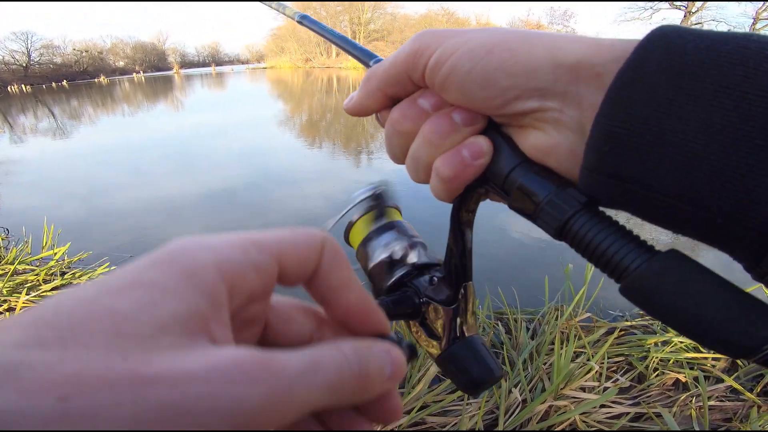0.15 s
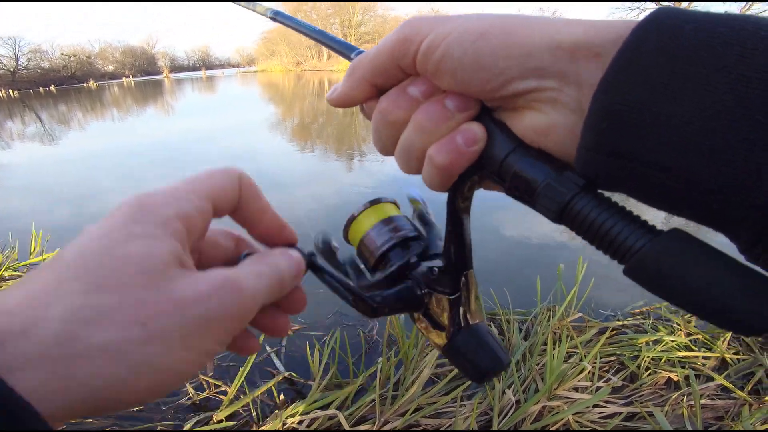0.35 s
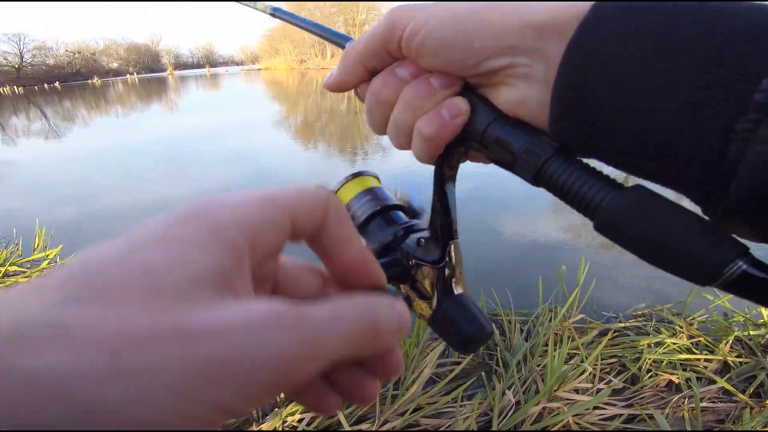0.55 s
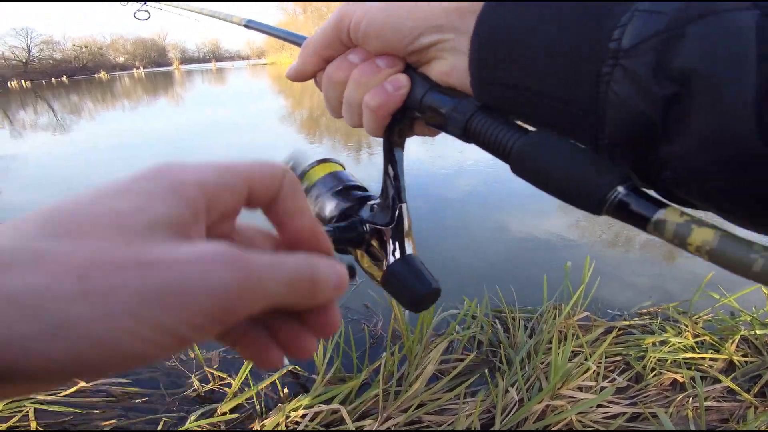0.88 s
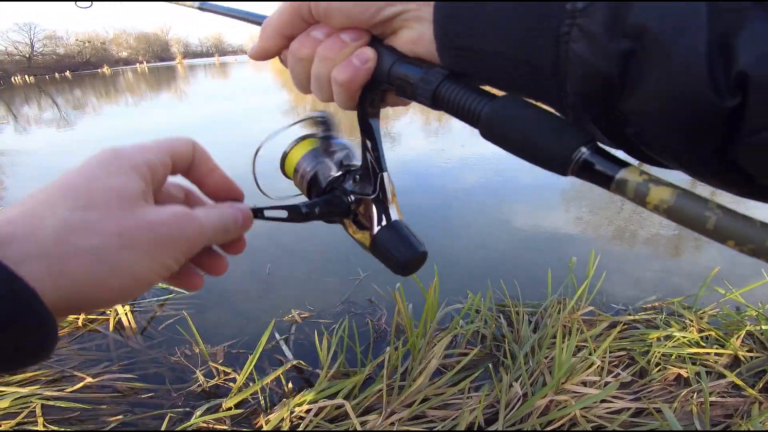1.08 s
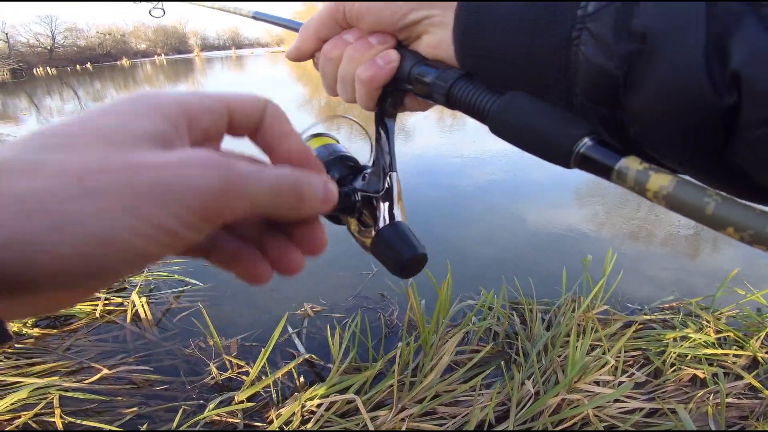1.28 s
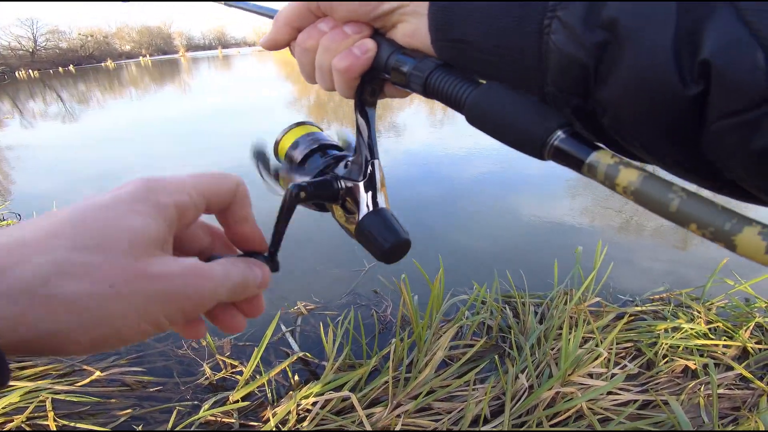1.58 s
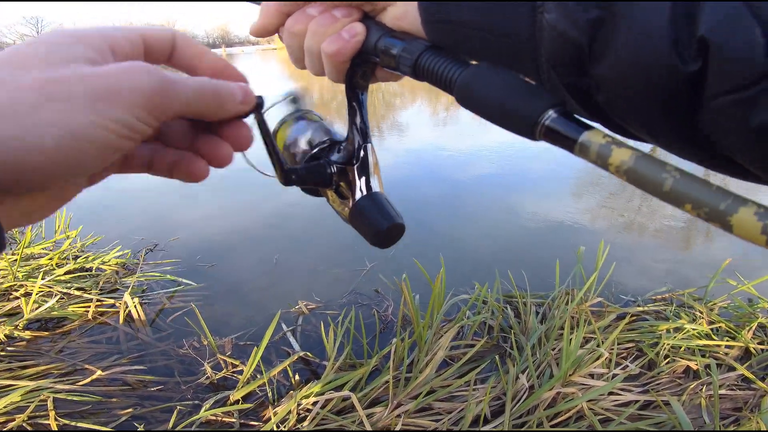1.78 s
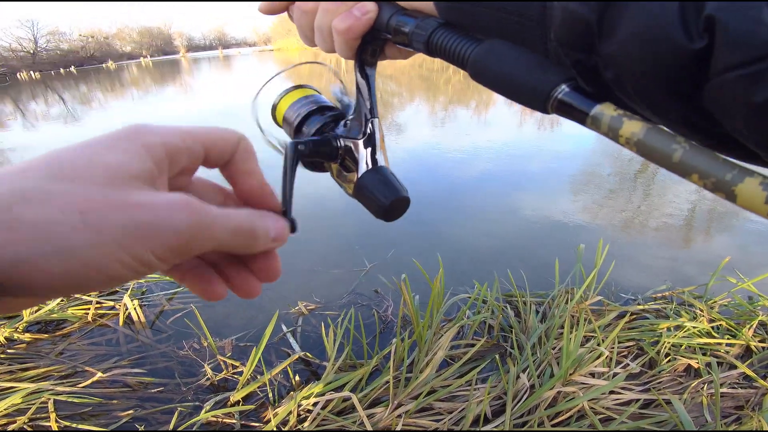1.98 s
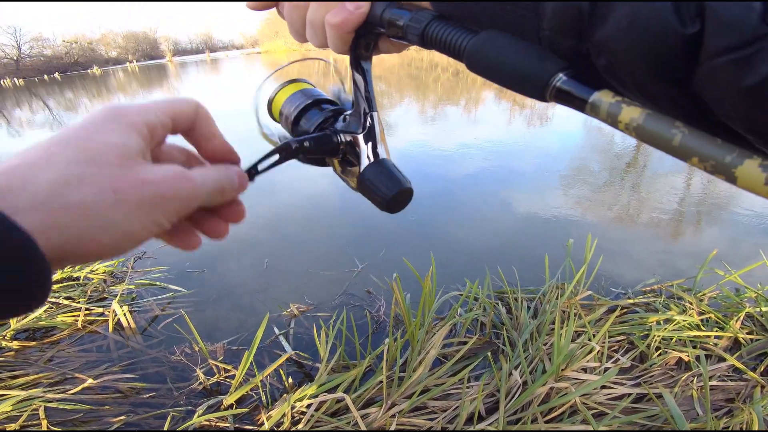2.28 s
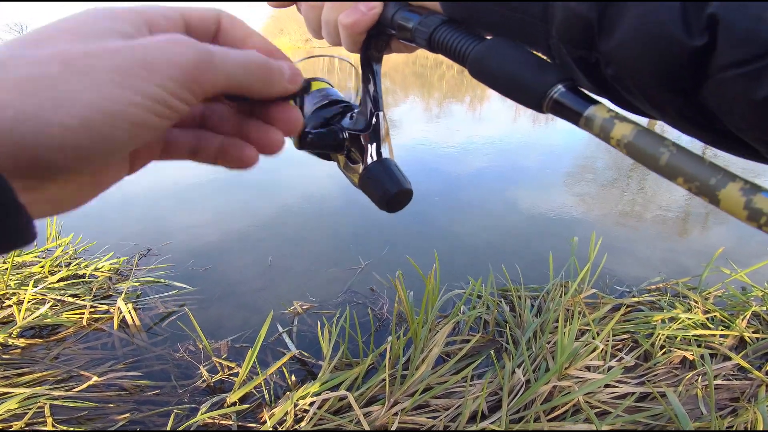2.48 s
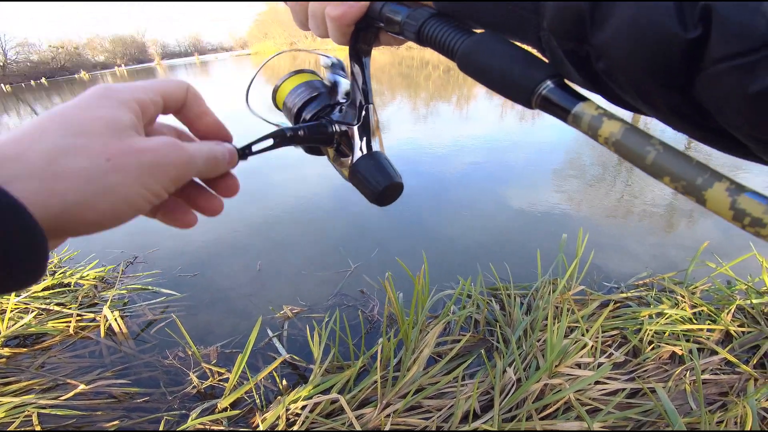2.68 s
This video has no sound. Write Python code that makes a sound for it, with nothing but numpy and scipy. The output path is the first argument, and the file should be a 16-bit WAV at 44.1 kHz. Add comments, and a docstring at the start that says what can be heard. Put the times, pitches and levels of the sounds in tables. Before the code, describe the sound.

A fishing reel is cranked, its drag clicking in a fast, uneven buzz.

```python
"""Single sharp clicks quicken to a buzz: a spinning reel is cranked against its slipping drag, and a steel
clicker spring snaps over the spool's toothed ring, faster and slower as the handle goes round.
We are by a pond, the camera's stereo microphone close to the reel. The loose handle knocks twice.
Wind buffets the two microphone ports, and behind it all the outdoors hisses faintly."""
import sys
import numpy as np
from scipy.fft import rfft, irfft, next_fast_len
from scipy.io import wavfile
from scipy.ndimage import uniform_filter1d, map_coordinates

SR = 44100
rng = np.random.default_rng(int(sys.argv[2]) if len(sys.argv) > 2 else 0)


def wrap_up_sound(samples):
    """Save the sound to the file named by the first command line argument, as 16-bit audio."""
    columns = np.atleast_2d(samples).T
    # keep every value between -1 and 1, then stretch to whole-number steps
    tamed = np.clip(columns, -1, 1)
    steps = np.round(tamed * 32767).astype(np.int16)
    wavfile.write(sys.argv[1], SR, steps)


N = 125685

# The spool's turning: t/s, teeth passed under the clicker
SPOOL_TRAVEL = [(0.0285, 0), (0.0734, 1), (0.1002, 2), (0.1178, 3), (0.1318, 4), (0.1535, 6), (0.2034, 11),
                (0.2444, 16), (0.2773, 21), (0.3004, 25), (0.4199, 48), (0.4663, 55), (0.4845, 57),
                (0.4992, 58), (0.5232, 59), (0.5433, 60), (0.5752, 62), (0.6017, 64), (0.6229, 66),
                (0.6624, 71), (0.7761, 94), (0.8382, 107), (0.8694, 111), (0.8966, 114), (0.9533, 121),
                (1.0087, 131), (1.1146, 153), (1.1797, 165), (1.22, 171), (1.2416, 173), (1.2658, 174),
                (1.2961, 175), (1.3629, 177), (1.3882, 178), (1.4092, 179), (1.4228, 180), (1.4475, 183),
                (1.4709, 187), (1.4934, 190), (1.5589, 201), (1.7048, 221), (1.7246, 223), (1.7694, 227),
                (1.8157, 232), (1.8378, 235), (1.976, 263), (2.0252, 271), (2.099, 280), (2.1747, 287),
                (2.2072, 291), (2.2609, 299), (2.389, 320), (2.4593, 329), (2.5171, 335), (2.5751, 340),
                (2.5972, 342), (2.6166, 344), (2.6338, 346), (2.6855, 352), (2.7102, 354), (2.7241, 355),
                (2.7404, 356), (2.7583, 357), (2.7868, 358)]
# Click strength as the reel turns and sways: t/s, then level/dB of rod, housing, spool, rim, spring
PART_LEVELS = [(0.0, -61, -36.5, -27.5, -35, -26.5), (0.15, -49.5, -31, -25, -27.0, -24.5),
               (0.27, -53, -32.5, -36.5, -34.5, -26), (0.4, -52, -31, -28.5, -29, -22),
               (0.53, -53, -34, -29.5, -26, -25.5), (0.64, -53.5, -34.5, -32.5, -28, -24.5),
               (0.77, -50, -34.5, -24, -26.5, -23.5), (0.9, -53, -33.5, -25.5, -29, -21),
               (1.0, -53, -35, -30.5, -32.5, -24), (1.13, -54.5, -32, -22.5, -27, -21),
               (1.25, -53, -39.5, -30, -29, -23.5), (1.4, -60, -40.5, -27.5, -31.0, -22.5),
               (1.5, -57.5, -36.5, -26.5, -31, -23), (1.68, -54.5, -36.5, -25, -32, -22.5),
               (1.79, -53.5, -38, -30.5, -41, -24.5), (1.9, -59, -36, -22, -32, -23.5),
               (2.05, -58.5, -36.5, -26.5, -28.0, -21), (2.15, -59.0, -39, -28, -38, -23.5),
               (2.3, -62, -38.5, -23.5, -35, -23), (2.45, -59.5, -36, -24.0, -31.5, -21),
               (2.58, -59, -39.5, -33.0, -38, -24), (2.68, -62.5, -37.5, -27.5, -34, -23.5),
               (2.8, -77, -44.5, -36.5, -42, -21)]
# Modes of each part: f/Hz, width/Hz, level/dB, gain per doubled click rate/dB,
# gain as the reel tilts/(dB/s), right below left/dB, right phase lag/rad
ROD_MODES = [(690, 120, -17, -1, .1, 0.5, 0.055), (804.5, 69, -8.5, 3, 1, 1.5, 0.66),
             (1140, 310, 2.5, 1.8, 0.3, 1, 0.89)]
HOUSING_MODES = [(2105, 600, -13.5, 1, 3, 7.6, 0.96), (2675, 265, -5.5, 1, .1, 6.1, .5),
                 (2867.5, 73, -8, -0.59, -2.5, 11, 0.83), (3052, 260, -8.5, 0.87, .1, 4, 0.98),
                 (3710, 770, -8, -0.99, 2.5, 15, 1), (4424, 310, -9, 0.33, -0.5, 2, 0.52)]
SPOOL_MODES = [(5039, 474, -3.5, -0.49, -0.81, 3.2, 2.71), (5923, 1480, -2.5, 1, 1, 21, 1.9),
               (6427, 410, -8.5, 1, 0.35, 3.5, 1.6)]
RIM_MODES = [(6740, 164, -0.39, 0.22, -.6, 8.7, 2.4), (7218, 285, -5.27, 0.00093, 0.021, 13, 4.96)]
SPRING_MODES = [(8860, 2550, -12.5, -0.16, -1, 11.6, 1.2), (9183, 274, -7, -1, 1, 12.4, 2.25),
                (10700, 2900, -10, 0.042, 0.49, 12, 1.73), (11830, 1440, -6.5, 0.00077, 0.87, 9.6, 1.42),
                (12940, 730, -19, 0.26, -.6, 3.6, 2.5), (13850, 440, -12.5, 0.63, -1.1, 7.3, 4.2),
                (15450, 1200, -15, .1, .1, 4.8, 3)]
# Play in the handle: t/s, level/dB
HANDLE_KNOCKS = [(0.606, -34.5), (0.947, -28)]
# Wind on the microphone: t/s, rumble level/dB, flutter level/dB, left over right/dB
GUSTS = [(0.0, -45.5, -61, -6), (0.06, -54, -65, -23), (0.13, -43.5, -71, 8), (0.19, -53, -64, -6.0),
         (0.29, -56.5, -75, 22), (0.34, -53, -77, 10), (0.38, -58.5, -74, 16.0), (0.43, -59, -67, -10),
         (0.46, -53, -73, -11.0), (0.49, -45, -75, -2), (0.52, -38.5, -60, 17), (0.6, -47, -72, 2),
         (0.81, -54.5, -71, 19), (0.89, -57, -88, 10.0), (0.97, -58, -76, 12.0), (1.01, -54, -43, 31.0),
         (1.05, -53, -89, 10), (1.15, -60, -78, 21), (1.4, -70.5, -55, -9), (1.6, -58, -91, -6),
         (1.67, -51, -91, 30), (1.72, -53.5, -77, -1), (1.85, -63, -66, 11), (1.89, -59, -58, -11),
         (1.98, -43.5, -59, 21), (2.02, -54, -60, 2), (2.22, -57.5, -59, 8), (2.45, -63.5, -58, 3),
         (2.63, -60.5, -69, -7), (2.85, -55, -70.5, 4)]
# Single eddies at the ports: t/s, level/dB, f/Hz, left over right/dB
EDDIES = [(0.062, -53, 48, -7), (0.118, -56, 67, 11), (0.135, -49, 73, 9), (0.175, -50, 65, -14),
          (0.288, -42.5, 65.5, 30), (0.315, -51, 62, 9), (0.44, -40, 100, -21), (0.467, -36, 89, -20),
          (0.482, -39, 100, -6), (0.493, -38.5, 80, 16), (0.517, -37, 63.4, -25), (0.531, -45, 66, -4),
          (0.551, -55, 31, 11), (0.567, -42, 83, 13), (0.59, -57, 64, 0), (0.632, -39, 99, -17),
          (0.651, -38.5, 63, 8), (0.665, -39, 105, 13), (0.683, -42, 80, 19), (1.008, -40.5, 100, 32),
          (1.68, -47, 68, 28), (1.695, -45, 90, 25), (1.712, -49, 56, 15), (1.852, -43, 56.3, 33),
          (1.96, -46, 47.6, 16), (1.975, -49, 152, 30), (1.99, -34.5, 73, 29), (2.008, -44, 45, 14),
          (2.036, -38, 61, -2), (2.059, -30, 104, 11), (2.073, -28, 139, 8), (2.085, -33.5, 75, 2),
          (2.096, -32, 156, 5), (2.103, -28.5, 185, -5), (2.112, -32.5, 129, -1), (2.117, -36, 117, 1),
          (2.266, -38, 164, 4), (2.286, -41.5, 40.5, -1), (2.305, -48, 114, 1), (2.329, -29, 179, 3.5),
          (2.338, -46, 189, -3), (2.35, -38, 67.5, -3), (2.407, -34, 149, 3), (2.743, -35.5, 92, 2.5)]
# Spectra of wind rumble, wind flutter and open air: f/Hz, level/dB (relative, per Hz)
RUMBLE_SPECTRUM = [(15, -12), (40, -1), (70, 1.5), (120, -9.5), (200, -21), (400, -40)]
FLUTTER_SPECTRUM = [(60, -47), (130, -15.5), (200, -6.5), (280, -9), (400, -11.5), (700, -20)]
AIR_SPECTRUM = [(200, -5), (450, 0), (700, -8), (1600, -20), (2200, -13), (3000, -24), (9000, -30),
                (13000, -38)]

TIME = np.arange(N) / SR
FFT_SIZE = next_fast_len(N + SR // 4)
FREQS = np.fft.rfftfreq(FFT_SIZE, 1 / SR)


def reel(trim_db=-5.5, usual_clicks_per_s=120, drift_db=2.5, drift_clicks=14.05):
    """The reel, close up: each click rings every part's modes, which swell and fade as the spool turns."""
    starts, force = clicker()
    latest_click = np.clip(np.searchsorted(starts, np.arange(N), "right") - 1, 0, None)
    click_rate = SR / uniform_filter1d(np.gradient(starts * 1.), size=5)
    doublings = np.log2(click_rate / usual_clicks_per_s)
    from_middle_s = (starts - N / 2) / SR
    times, *part_levels = np.transpose(PART_LEVELS)
    parts = [ROD_MODES, HOUSING_MODES, SPOOL_MODES, RIM_MODES, SPRING_MODES]
    spectrum = np.zeros((2, len(FREQS)), complex)
    for modes, levels in zip(parts, part_levels):
        part_db = trim_db + np.interp(starts / SR, times, levels)
        for k, (hz, width, db, faster_db, tilt_db_per_s, below_db, lag) in enumerate(modes):
            scatter, side_scatter, knots = rng.standard_normal((len(starts), 3)).T
            drift = map_coordinates(knots, [np.arange(len(starts)) / drift_clicks])
            left_db = part_db + db + faster_db * doublings + tilt_db_per_s * from_middle_s
            left_db += 1.2 * scatter + drift_db * drift
            right_db = left_db - below_db + 1.5 * side_scatter
            gain = amp([left_db, right_db])[:, latest_click]
            ring = (-1) ** k * resonance(hz, width) * np.sqrt(SR / width)
            stereo_phase = np.exp(-1j * np.array([[0], [lag]]))
            spectrum += rfft(force * gain, FFT_SIZE) * ring * stereo_phase
    return irfft(spectrum, FFT_SIZE)[:, :N]


def clicker(jitter_s=.0003, size_scatter_db=.6, stereo_spread=.66):
    """Each tooth lifts the spring with a tick; it snaps down and rattles. Gives start samples and force."""
    snap_delay_s, rise_s, hold_s = .0022, .0012, .0007
    tick_t60, snap_t60, echo_t60 = .006, .011, .055
    times, teeth = np.transpose(SPOOL_TRAVEL)
    tooth_times = np.interp(np.arange(teeth[-1] + 1), teeth, times)
    jitter, delay_db, size = rng.standard_normal((len(tooth_times), 3)).T
    starts = np.round((tooth_times + jitter_s * jitter) * SR).astype(int)
    strength = amp(size_scatter_db * size[:, None])
    t = np.arange(SR // 12) / SR
    samples = (starts[:, None] + np.arange(len(t))).ravel()

    def train(shape):
        """One envelope a click; overlaps add in power."""
        return np.sqrt(np.bincount(samples, (shape * strength).ravel() ** 2, N + SR)[:N])

    tick = amp(-1 - 60 * t / tick_t60)
    since_snap = t - snap_delay_s * amp(delay_db[:, None])
    rise = np.exp(-(since_snap / rise_s) ** 2)
    decay = amp(-60 * np.maximum(since_snap - hold_s, 0) / snap_t60)
    snap = np.where(since_snap < 0, rise, decay)
    left, other = np.sign(rng.standard_normal((2, N)))
    right = np.sqrt(1 - stereo_spread ** 2) * left + stereo_spread * other
    direct = train(tick + snap) * np.array([left, right])
    # faint scatter off hands, jacket and bank, dull above 6 kHz
    tail = (since_snap > 0) * amp(-15 - 60 * t / echo_t60)
    echo = filtered(train(tail) * rng.standard_normal((2, N)), 1 / (1 + 1j * FREQS / 6000) ** 2)
    return starts, direct + echo


def handle(t60=.025, right_db=-10):
    """The loose handle knocks dully against its stop, left of centre."""
    envelope = sum((TIME > s) * amp(db + 3 - 60 * np.abs(TIME - s) / t60) for s, db in HANDLE_KNOCKS)
    knock = filtered(envelope * rng.standard_normal(N), resonance(hz=2070, width=3700))
    return knock * amp([[0], [right_db]])


def wind(lump_db=2):
    """Lumpy rumble, now on one microphone port, now on the other, with a higher flutter in the gusts."""
    times, *columns = np.transpose(GUSTS)
    rumble_db, flutter_db, pan_db = [np.interp(TIME, times, column) for column in columns]
    rumble = unit(amp(lump_db * wobble(30.77)) * noise(RUMBLE_SPECTRUM, correlation=0.5))
    flutter = unit(amp(lump_db * wobble(45)) * noise(FLUTTER_SPECTRUM, correlation=1))
    return pan_gains(pan_db) * (amp(rumble_db) * rumble + amp(flutter_db) * flutter)


def eddies(width_cycles=0.43, trim_db=0.5):
    """Single eddies thump the ports: one push with a dip on each side."""
    thumps = np.zeros((2, N))
    for s, db, hz, pan_db in EDDIES:
        cycles = (TIME - s) * hz
        push = np.cos(2 * np.pi * cycles) * np.exp(-(cycles / width_cycles) ** 2)
        thumps += amp(db + trim_db) * pan_gains(pan_db)[:, None] * push
    return thumps


def open_air(level_db=-75.5):
    """The faint hiss around the pond, nearly the same in both channels."""
    return amp(level_db) * noise(AIR_SPECTRUM, correlation=0.99)


def amp(db):
    return 10 ** (np.asarray(db) / 20)


def unit(x):
    return x / np.sqrt(np.mean(x ** 2) + 1e-20)


def filtered(x, response):
    """x through a response given at FREQS."""
    return irfft(rfft(x, FFT_SIZE) * response, FFT_SIZE)[..., :N]


def resonance(hz, width):
    """Response of two like band-passes in series."""
    return (1j * FREQS * width / (hz ** 2 - FREQS ** 2 + 1j * FREQS * width)) ** 2


def noise(spectrum, correlation):
    """Stereo noise of rms 1, partly shared by the channels."""
    hz, db = np.transpose(spectrum)
    mid, side = rng.standard_normal((2, N))
    angle = np.arccos(correlation) / 2
    pair = np.cos(angle) * mid + np.sin(angle) * side * [[1], [-1]]
    return unit(filtered(pair, amp(np.interp(np.log(FREQS + 1), np.log(hz), db))))


def wobble(knots_per_s):
    """A smooth random curve for each channel."""
    knots = rng.standard_normal((2, int(N * knots_per_s / SR) + 4))
    return np.array([map_coordinates(row, [TIME * knots_per_s]) for row in knots])


def pan_gains(pan_db):
    """Left and right gains with a mean of 1."""
    return amp(np.minimum([pan_db, -pan_db], 0)) * 2 / (1 + amp(-np.abs(pan_db)))


def scene():
    """Reel and handle up close, wind right on the microphone, open air behind."""
    return reel() + handle() + wind() + eddies() + open_air()


def record(dry, top_hz=15800):
    """The camera keeps nothing above its band limit."""
    return filtered(dry, FREQS < top_hz)


dry = scene()
out = record(dry)
wrap_up_sound(out)
```